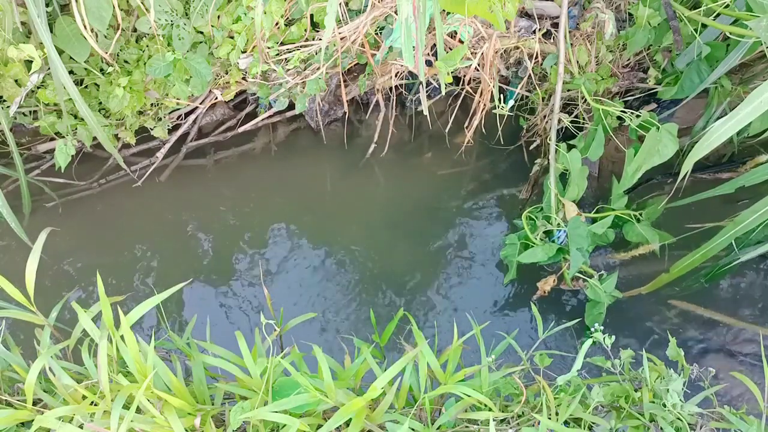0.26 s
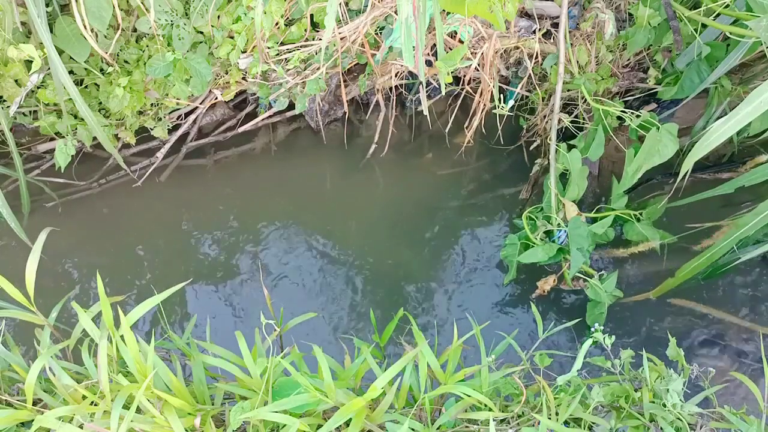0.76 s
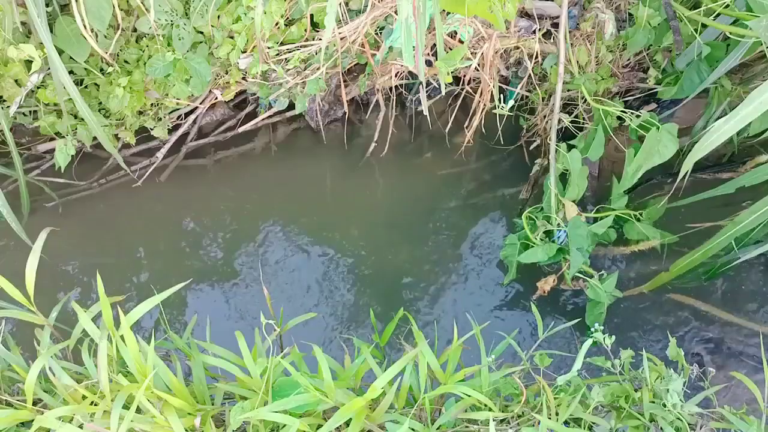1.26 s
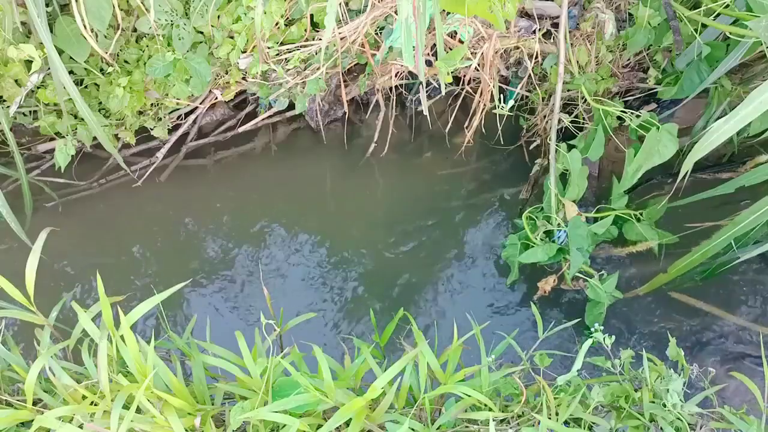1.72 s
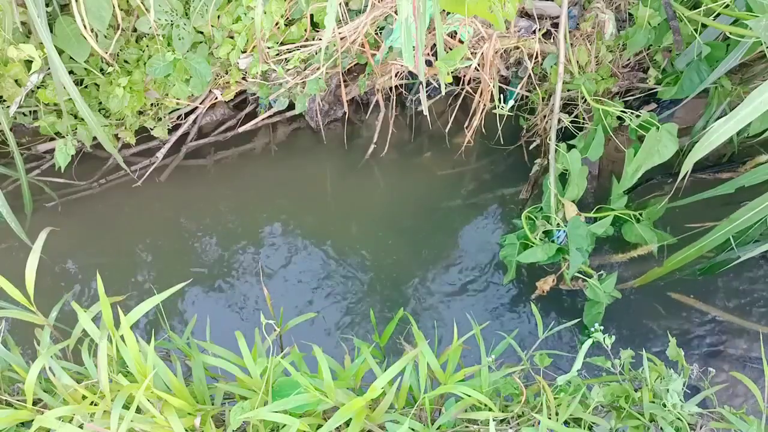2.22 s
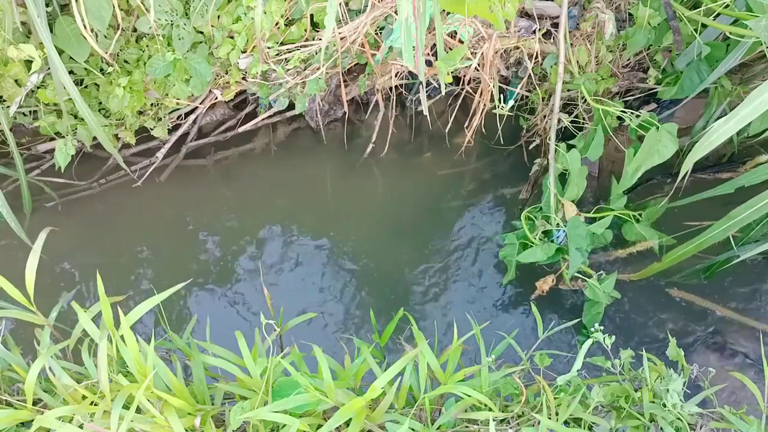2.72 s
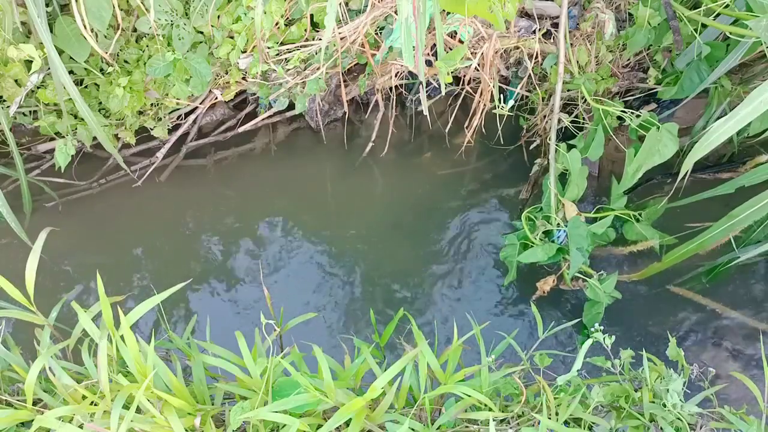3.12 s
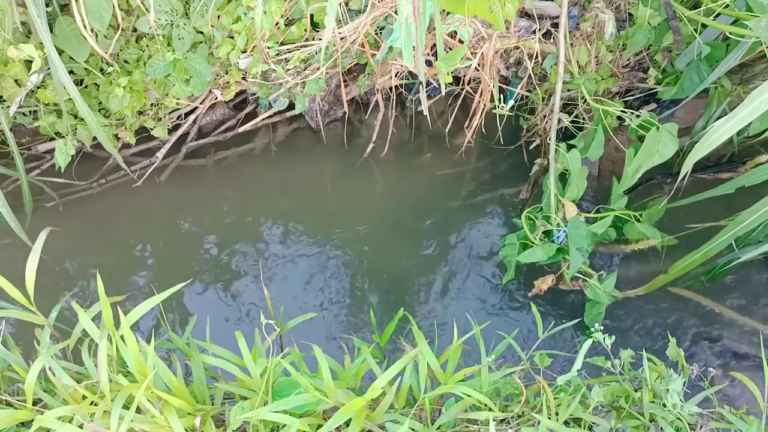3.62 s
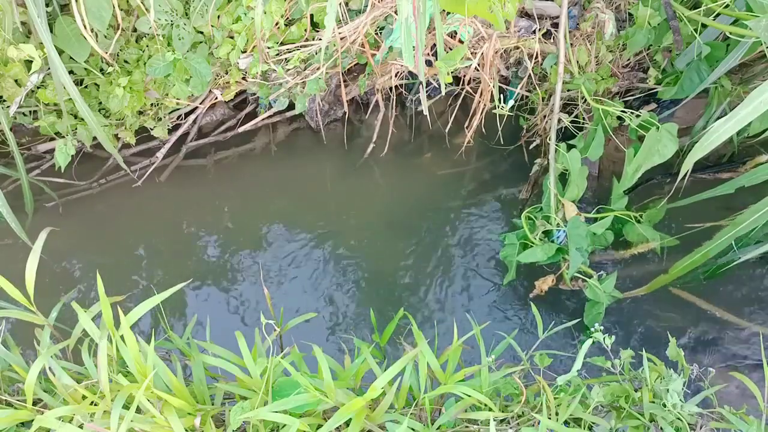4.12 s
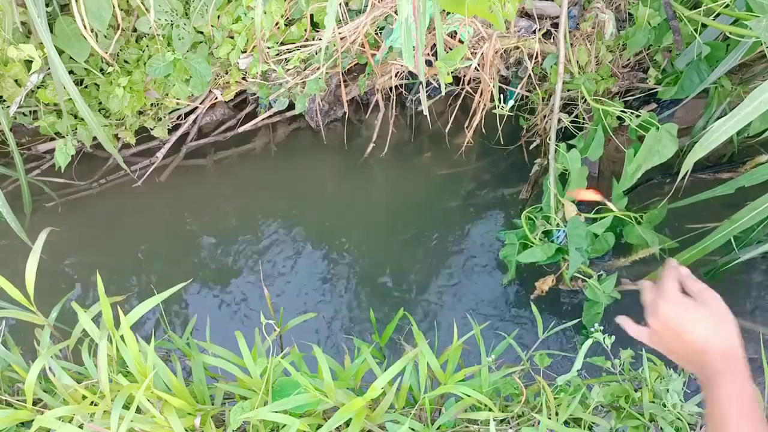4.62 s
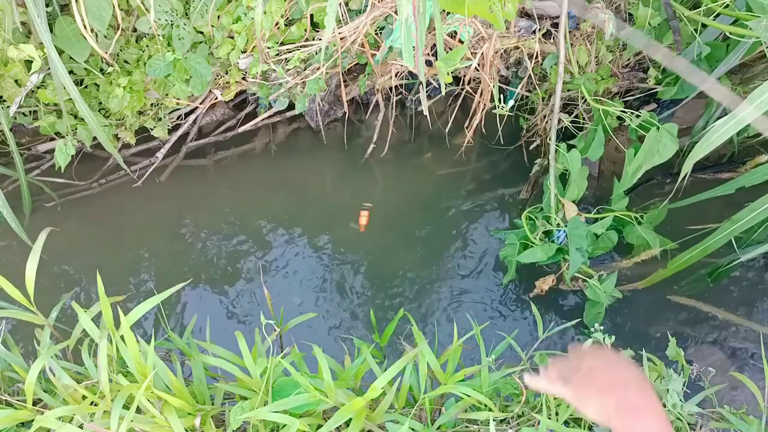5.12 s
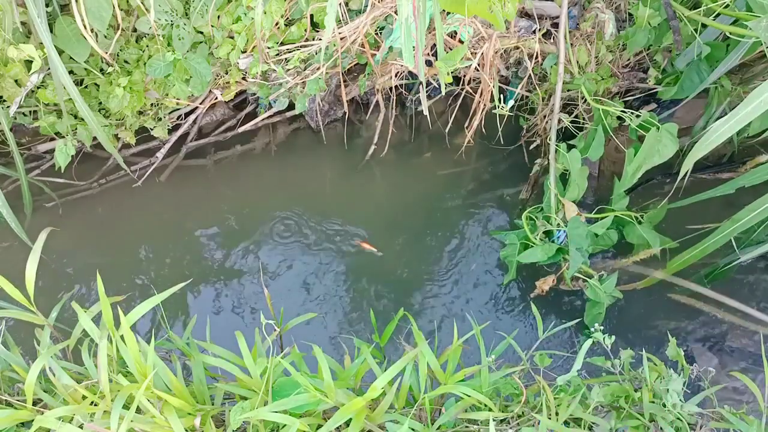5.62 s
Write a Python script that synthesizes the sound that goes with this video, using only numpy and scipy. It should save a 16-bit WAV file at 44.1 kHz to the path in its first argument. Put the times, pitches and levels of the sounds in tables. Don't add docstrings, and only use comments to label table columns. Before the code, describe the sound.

A close, bubbling stream hisses and plinks without pause beneath a rapid cricket trill, throbbing insects and a very faint low hum.

```python
import sys
import numpy as np
from scipy import signal
from scipy.fft import rfft, irfft, dct
from scipy.io import wavfile
from scipy.ndimage import uniform_filter1d

SR = 44100
rng = np.random.default_rng(int(sys.argv[2]) if len(sys.argv) > 2 else 0)


def log_audio(samples):
    frames = np.atleast_2d(samples).T
    limited = np.clip(frames, -1, 1)
    pcm = np.round(limited * 32767).astype(np.int16)
    wavfile.write(sys.argv[1], SR, pcm)


def volts_from_db(level):
    exponent = np.asarray(level, float) / 20
    return 10 ** exponent


N = 258426
WHITE_DB = 10 * np.log10(2 / SR)
LAG_S = 14 / SR


def evened(x):
    return x / np.sqrt(np.mean(x ** 2) + 1e-20)


def read_curve(points, hz, column=1):
    table = np.transpose(points)
    return np.interp(np.log(hz + 1), np.log(table[0] + 1), table[column])


def drift(per_s):
    t = np.arange(0, N, 64) / SR
    waves = 0
    for f in np.geomspace(.2, per_s, 20):
        waves = waves + np.sin(2 * np.pi * (f * t + rng.random())) / np.sqrt(f)
    return np.interp(np.arange(N) / SR, t, evened(waves))


def resonate(x, hz, width_hz):
    carrier = np.exp(2j * np.pi * np.cumsum(hz * np.ones(N)) / SR)
    r = np.exp(-np.pi * width_hz / SR)
    smooth = signal.lfilter([(1 - r) ** 2], [1, -2 * r, r * r], x / carrier)
    return 2 * (carrier * smooth).real


def lag_turn(hz):
    nearness = hz ** 2 / (hz ** 2 + 180 ** 2)
    return np.exp(-2j * np.pi * LAG_S * hz * nearness)


# frequency in Hz, level in dB per Hz.
LEFT_WASH = [(40, -85), (100, -86), (200, -80), (500, -83), (1600, -90), (3000, -88), (5000, -95),
             (6200, -93.5), (7300, -87.5), (10300, -86), (11500, -92), (12900, -97), (13500, -103),
             (15000, -106)]
# frequency in Hz, level in dB per Hz.
RIGHT_WASH = [(40, -84), (100, -83.5), (200, -80.5), (500, -81), (1600, -91.5), (3000, -82.5),
              (3900, -87.5), (5000, -84), (6600, -66.5), (7500, -74.5), (8400, -107), (9800, -102),
              (12800, -94), (14400, -83)]
# frequency in Hz, likeness from 0 to 1.
LIKENESS = [(60, 1), (300, 0.78), (1600, 0.73), (2200, 0), (3100, 0.72), (3800, 0), (8000, 0)]


def wash():
    hz, _, (near, own) = signal.stft(rng.standard_normal((2, N)), SR, nperseg=512, noverlap=384)
    patches = uniform_filter1d(rng.standard_normal(near.shape), 8, 0)
    patches = evened(uniform_filter1d(patches, 14, 1))
    flicker = uniform_filter1d(rng.standard_normal(near.shape), 90, 0)
    flicker = evened(uniform_filter1d(flicker, 6, 1))
    same = np.clip(read_curve(LIKENESS, hz), 0, 1)[:, None]
    left = same * lag_turn(hz)[:, None] * near + np.sqrt(1 - same ** 2) * own
    calm = 1 - .6 * np.exp(-((hz - 6700) / 1300) ** 2)
    liveliness = (np.minimum(hz / 500, 1) * calm)[:, None]
    ripples = np.array([left, near]) * volts_from_db((2.0 * patches + 1.4 * flicker) * liveliness)
    white = signal.istft(ripples, SR, nperseg=512, noverlap=384)[1][:, :N]
    hz = np.fft.rfftfreq(N, 1 / SR)
    colour_db = np.array([read_curve(LEFT_WASH, hz), read_curve(RIGHT_WASH, hz)]) - WHITE_DB
    return irfft(rfft(white) * volts_from_db(colour_db), N)


def bubble(hz, cycles, glide):
    u = np.arange(int(3 * cycles * SR / hz) + 2) * hz / SR / cycles
    shape = (u / 0.44) ** 1.06 * np.exp(1.06 * (1 - u / 0.28))
    return shape * np.sin(2 * np.pi * cycles * u * (1 + glide * u))


# pitch at one end in Hz, pitch at the other end in Hz, ring in cycles,
# bursts per second, spread of sizes in dB, level in dB.
GRAIN_LAYERS = [
    (200, 900, 6., 130, 4, -61),
    (621.5, 1900, 11, 55, 8, -61.5),
    (2384, 3600, 9., 420, 6, -54.5),
    (3810, 6300, 14, 370, 8, -54),
    (8900, 3500, 1.2, 290, 24.5, -67),
]


def grains(sizes=6):
    out = np.zeros(N)
    for lo_hz, hi_hz, cycles, per_s, spread_db, db in GRAIN_LAYERS:
        layer = np.zeros(N)
        busy = volts_from_db(5.0 * drift(18))
        for hz in np.geomspace(lo_hz, hi_hz, sizes):
            chance = rng.random(N) / (busy * per_s / sizes / SR)
            size_db = spread_db * np.minimum(-np.log(chance + 1e-9), 3)
            bursts = (chance < 1) * volts_from_db(size_db)
            layer += signal.oaconvolve(bursts, bubble(hz, cycles, rng.uniform(0, .12)))[:N]
        out += volts_from_db(db) * evened(layer)
    return out


def singles(rows, cycles, glide, db):
    out = np.zeros(N + SR)
    for s, peak_db, hz in rows:
        pop = volts_from_db(peak_db + db) * bubble(hz, cycles, glide)
        out[round(s * SR):][:len(pop)] += pop
    return out[:N]


# start in seconds, peak in dB, pitch in Hz.
GULP_EVENTS = [(0.076, -41, 530), (0.121, -43, 487), (0.415, -36.5, 746), (0.742, -39, 716),
               (0.87, -40.5, 220), (0.977, -39, 176), (0.974, -34.5, 256), (1.226, -36, 805),
               (1.729, -36, 427), (1.84, -35.5, 480), (1.93, -39, 314), (2.317, -37, 500),
               (2.377, -36.5, 398), (2.482, -32.5, 493), (2.567, -45, 200), (2.795, -34.5, 715),
               (2.889, -38, 385), (3.106, -39.5, 680), (3.737, -38.5, 290), (4.003, -34.5, 507),
               (4.051, -41, 317), (4.084, -37, 647), (4.122, -37, 640), (4.674, -39, 644),
               (4.695, -34, 666), (4.752, -38, 487), (4.797, -38.5, 467), (4.892, -42, 247),
               (5.203, -41, 396)]
# start in seconds, peak in dB, pitch in Hz.
SPIT_EVENTS = [
    (1.1756, -41, 15000),
    (2.1479, -36, 14700),
    (2.4837, -27, 14200),
    (3.193, -25, 14600),
    (4.2147, -23, 15100),
    (4.4701, -21, 14800),
    (5.6445, -25.5, 14700),
]
# start in seconds, peak in dB, pitch in Hz.
DRIP_EVENTS = [(0.152, -26.5, 3020), (0.183, -28, 2860), (0.5606, -30, 3260), (0.8301, -21.5, 2690),
               (0.908, -19, 3150), (1.0241, -30, 3220), (1.076, -21, 2870), (1.2, -29, 2580),
               (1.2793, -28, 3100), (1.3566, -23.5, 3130), (1.442, -29, 2460), (1.7196, -26, 2880),
               (1.8298, -25.5, 2950), (1.874, -22.5, 3020), (1.917, -25, 3230), (2.3425, -29, 3070),
               (2.7587, -28, 2940), (2.8315, -28.5, 2920), (2.9913, -24.5, 2960), (3.1239, -20, 2860),
               (3.3218, -25, 3080), (3.3643, -27.5, 3250), (3.7512, -26.5, 3200), (4.0014, -26, 3240),
               (4.3517, -26, 3260), (4.6772, -30, 3020), (4.698, -26, 3100), (5.1448, -25, 3110),
               (5.667, -29, 3050), (5.7907, -18.5, 3150)]
# start in seconds, peak in dB, pitch in Hz.
TICK_EVENTS = [
    (0.8424, -21, 6360),
    (1.3647, -23, 6000),
    (2.7107, -19, 6040),
    (2.8703, -20.5, 5730),
    (3.233, -26, 5450),
    (4.0047, -50, 6070),
    (4.9875, -20, 5860),
    (5.4938, -26, 5560),
]
# start in seconds, peak in dB, pitch in Hz.
SNAP_EVENTS = [
    (1.7329, -33, 5260),
    (2.2933, -38, 5000),
    (2.391, -29, 5080),
    (2.694, -32, 4760),
    (4.39, -35, 4600),
    (5.7907, -31, 5160),
]


def water():
    near = grains()
    near = near + singles(GULP_EVENTS, cycles=4.6, glide=.05, db=0)
    near = near + singles(SPIT_EVENTS, cycles=10.0, glide=.01, db=2)
    near = near + singles(DRIP_EVENTS, cycles=7, glide=.03, db=-.5)
    near = near + singles(TICK_EVENTS, cycles=11., glide=.01, db=3)
    near = near + singles(SNAP_EVENTS, cycles=3., glide=.02, db=14)
    right = near + volts_from_db(-9.5) * np.roll(near, round(.0055 * SR))
    left_slaps = np.roll(near, round(.0083 * SR)) - np.roll(near, round(.0131 * SR))
    left = near + volts_from_db(-12) * left_slaps
    hz = np.fft.rfftfreq(N, 1 / SR)
    shade_db = np.minimum(read_curve(LEFT_WASH, hz) - read_curve(RIGHT_WASH, hz), 3)
    shade_db = shade_db - 4 * hz ** 2 / (hz ** 2 + 2500 ** 2)
    left = irfft(rfft(left) * lag_turn(hz) * volts_from_db(shade_db), N)
    return np.array([left, right])


# first pulse in seconds, end in seconds.
CRICKET_RUNS = [
    (-.030, .5),
    (.558, 3.0),
    (3.059, 5.9),
]
CHIRP_S, CRICKET_HZ = .0721, 6450


def cricket(pulse_s=.012, left_db=-55.5, right_db=-34):
    t = np.arange(N) / SR
    gate = np.zeros(N)
    for start, end in CRICKET_RUNS:
        for s in np.arange(start, end - .03, CHIRP_S):
            for at in (s, s + CHIRP_S / 3):
                near = slice(max(round((at - .015) * SR), 0), max(round((at + .015) * SR), 0))
                stroke = np.exp(-((t[near] - at) / pulse_s * 2) ** 2)
                gate[near] += volts_from_db(2 * rng.standard_normal()) * stroke
    tone = np.sin(2 * np.pi * np.cumsum(CRICKET_HZ + 25 * drift(60)) / SR)
    return volts_from_db(np.array([[left_db], [right_db]])) * gate * tone


def throb(per_s, depth, sharp=0.86):
    pace = per_s * (1 + .012 * drift(3))
    beat = np.cos(np.pi * np.cumsum(pace) / SR) ** 2
    depth = np.clip(depth, 0, 1)
    return 1 - depth + depth * beat ** sharp


def buzzer(bouts, hz, per_s, width_hz, right_db):
    swell_s, hush_s, rest_db = .25, .1, -70
    t = np.arange(N) / SR
    effort_db = []
    for start, end, db in bouts:
        ramp = np.minimum((t - start) / swell_s, (end - t) / hush_s) + .5
        effort_db.append(db - (db - rest_db) * (1 - np.clip(ramp, 0, 1)))
    scrape = rng.standard_normal((2, N)) * throb(per_s, .8)
    clear = evened(resonate(scrape[0], hz, width_hz))
    blurred = evened(resonate(0.26 * scrape[0] + scrape[1], hz, 3.5 * width_hz))
    return volts_from_db(np.max(effort_db, axis=0)) * np.array([clear, volts_from_db(right_db) * blurred])


# start in seconds, end in seconds, level in dB.
HIGH_BOUTS = [
    (-1, .9, -56),
    (1.7, 4.2, -57),
    (4.45, 7, -60.5),
]
# start in seconds, end in seconds, level in dB.
LOW_BOUTS = [
    (-1, .4, -60),
    (3.35, 4.6, -58),
]


def buzzers():
    high = buzzer(HIGH_BOUTS, hz=8120, per_s=88., width_hz=220, right_db=5.5)
    low = buzzer(LOW_BOUTS, hz=7600, per_s=83.6, width_hz=170, right_db=.5)
    return high + low


# pitch in Hz, width in Hz, throbs per second, depth from 0 to 1,
# right level in dB, left level in dB.
SINGERS = [
    (6800, 260, 22.2, .5, -43, -66),
    (7200, 240, 21.8, .6, -46, -62),
    (5450, 300, 14.5, .4, -53, -72),
    (7750, 400, 23.8, .7, -55, -68),
]


def chorus():
    out = np.zeros((2, N))
    for hz, width_hz, per_s, depth, right_db, left_db in SINGERS:
        pulses = throb(per_s, depth) * throb(4 * per_s, .7)
        song = evened(resonate(rng.standard_normal(N), hz, width_hz) * pulses)
        out += volts_from_db(np.array([[left_db], [right_db]])) * song
    return out


def hum(hz=54.5, db=-65):
    tone = np.sin(2 * np.pi * np.cumsum(hz + 4 * drift(12)) / SR)
    return volts_from_db(db + 1.5 * drift(8)) * tone


def scene():
    return wash() + water() + cricket() + buzzers() + chorus() + hum()


def band_limit(x):
    return signal.sosfilt(signal.butter(12, 16780, fs=SR, output="sos"), x)


# frequency in Hz, left or sum step in dB per Hz,
# right or difference step in dB per Hz.
ROUNDING_STEPS = [(800, -97, -96), (1100, -88.5, -93), (1550, -87.5, -91), (1900, -88, -92),
                  (3000, -86, -86), (4000, -87, -88), (6200, -87, -82), (7900, -87, -84),
                  (8600, -84, -83.5), (9300, -87, -83), (10000, -87, -82), (10700, -86, -93),
                  (13000, -92, -90), (14100, -98, -86), (14800, -92, -85)]
BAND_STARTS = np.r_[0:40:4, 40:96:8, 96:144:12, 144, 160, 176, 196, 216, 240, 264, 292, 320:1024:32]


def record(dry, size=1024, offset=726, joint_hz=2000, edge_hz=15520):
    rise = np.cumsum(np.kaiser(size + 1, 4 * np.pi))
    window = np.sqrt(np.r_[rise[:-1], rise[-2::-1]] / rise[-1])
    padded = np.pad(dry, ((0, 0), (2 * size - offset, 2 * size)))
    starts = np.arange(0, padded.shape[1] - 2 * size, size)
    frames = padded[:, starts[:, None] + np.arange(2 * size)] * window
    a, b, c, d = np.split(frames, 4, axis=2)
    lines = dct(np.dstack([-c[..., ::-1] - d, a - b[..., ::-1]]), 4, norm="ortho")

    hz = np.arange(size) * SR / 2 / size
    joint = hz < joint_hz
    lines = np.where(joint, np.array([lines[0] + lines[1], lines[0] - lines[1]]) / 2, lines)

    widths = np.diff(np.r_[BAND_STARTS, size])
    centre_hz = np.repeat((BAND_STARTS + widths / 2) * SR / 2 / size, widths)
    step_db = np.array([read_curve(ROUNDING_STEPS, centre_hz, column=k) for k in (1, 2)])
    step = volts_from_db(step_db - WHITE_DB)[:, None]
    power = np.add.reduceat((lines / step) ** 2, BAND_STARTS, axis=2) / widths
    audible = (np.repeat(power, widths, axis=2) > .13) * (hz < edge_hz)
    lines = step * np.sign(lines) * np.floor(abs(lines) / step + .4) * audible
    lines = np.where(joint, np.array([lines[0] + lines[1], lines[0] - lines[1]]), lines)

    late, early = np.split(dct(lines, 4, norm="ortho"), 2, axis=2)
    frames = np.dstack([early, -early[..., ::-1], -late[..., ::-1], -late]) * window
    lapped = frames[:, 1:, :size] + frames[:, :-1, size:]
    mix = lapped.reshape(2, -1)[:, size - offset:][:, :N]
    return band_limit(mix)


dry = scene()
out = record(dry)
log_audio(out)
```